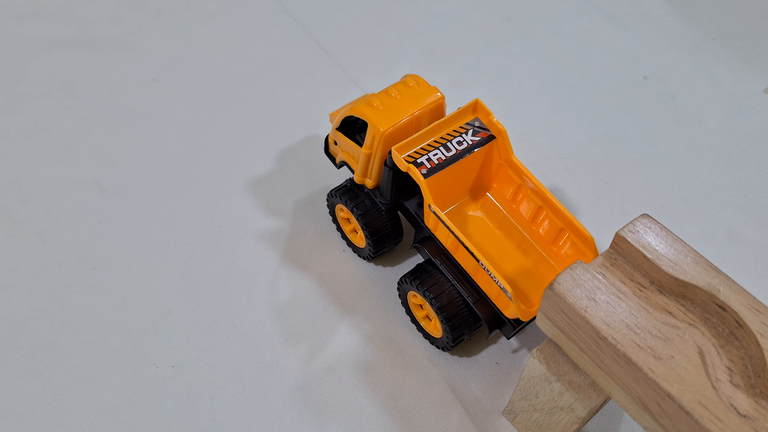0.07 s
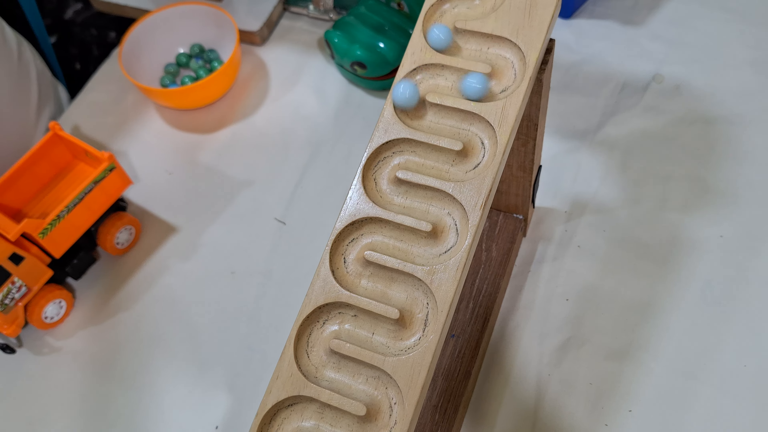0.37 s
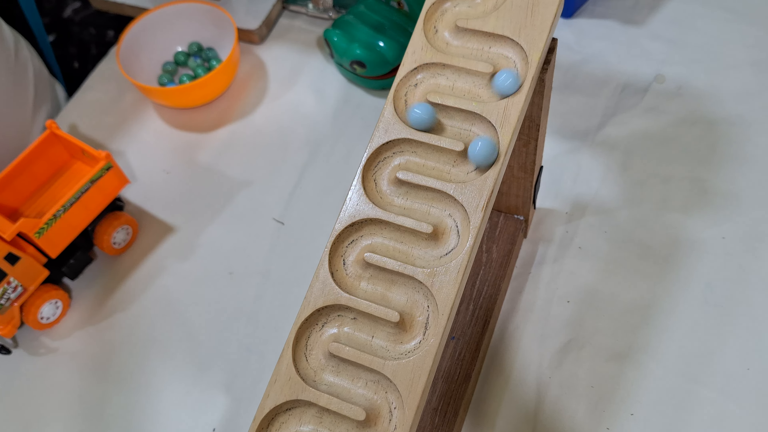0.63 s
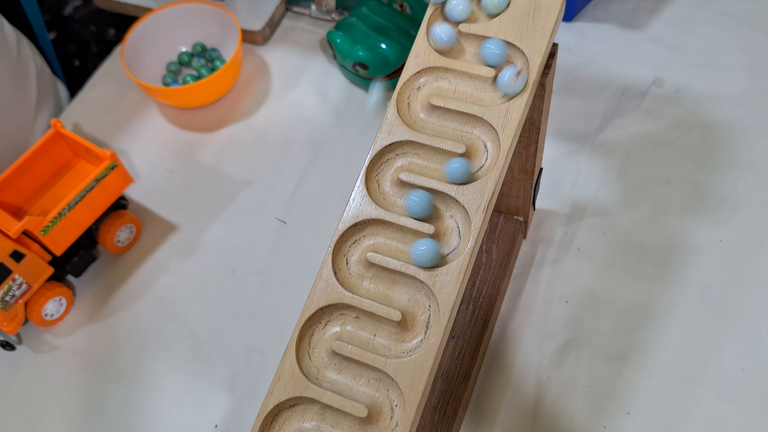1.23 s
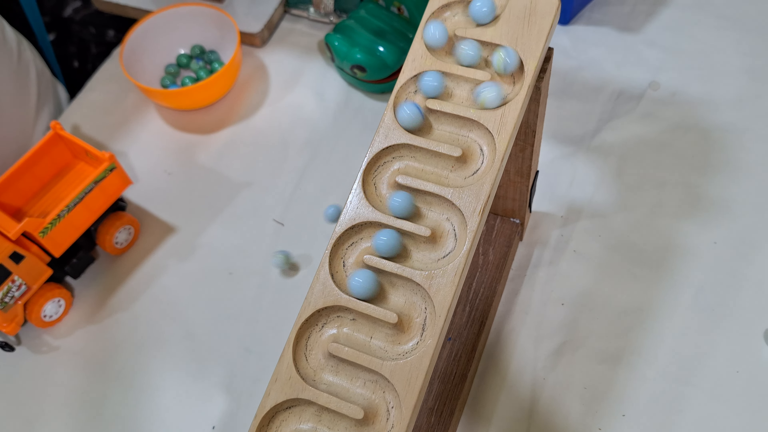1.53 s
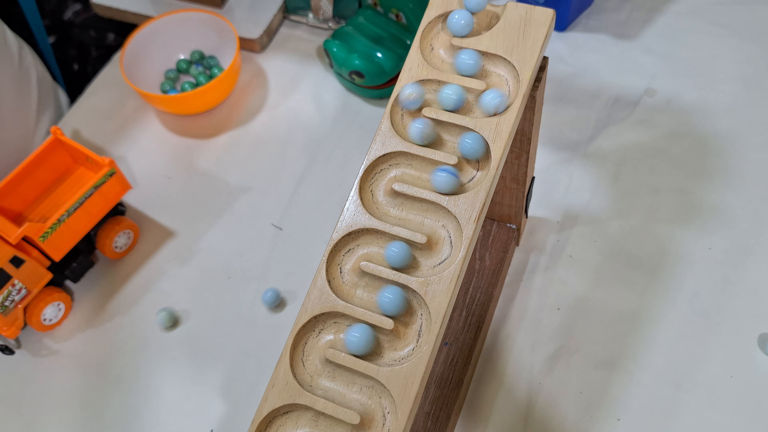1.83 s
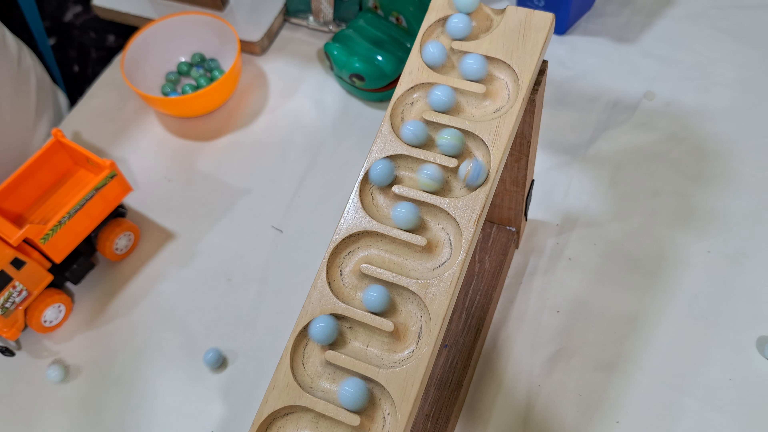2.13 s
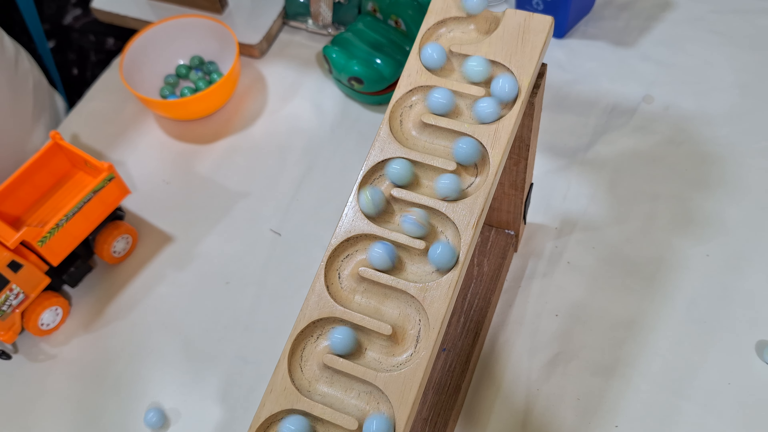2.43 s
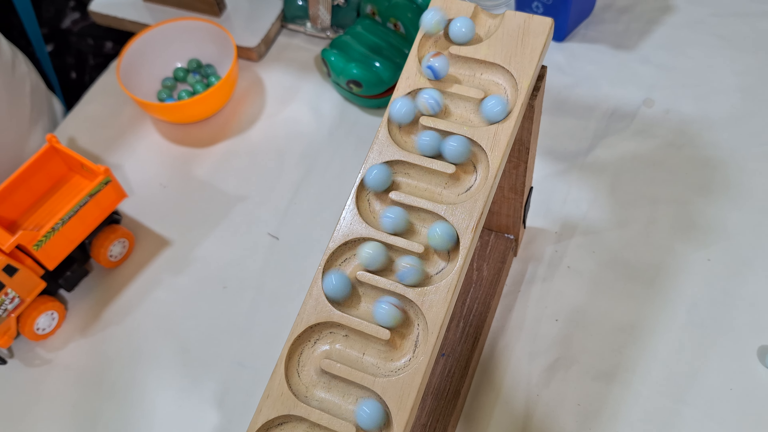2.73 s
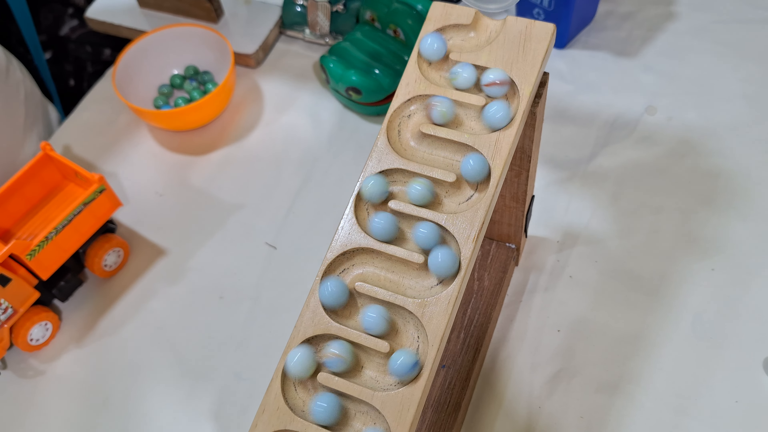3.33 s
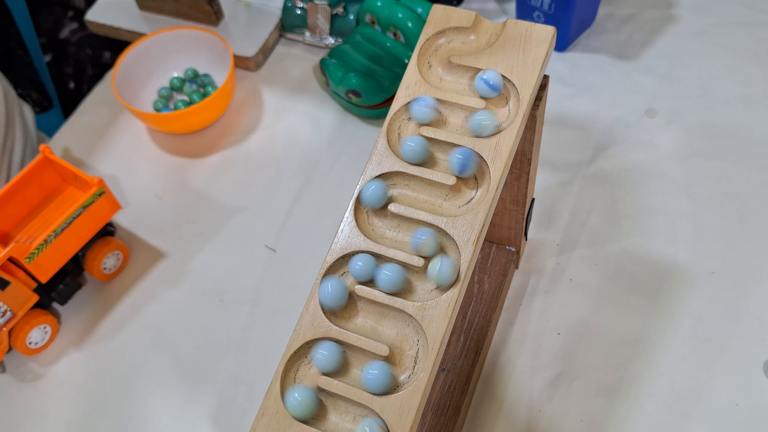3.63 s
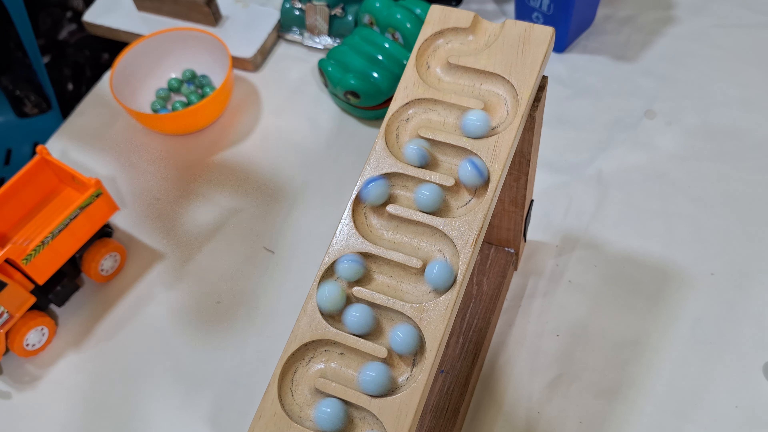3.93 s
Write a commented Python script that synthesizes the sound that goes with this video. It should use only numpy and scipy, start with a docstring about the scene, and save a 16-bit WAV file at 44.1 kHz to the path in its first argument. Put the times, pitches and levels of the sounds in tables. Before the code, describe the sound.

Glass marbles run down a winding wooden groove, heard close in a small room. After faint room tone, the first knocks against a bend at about 0.4 seconds, ringing the wood. More join, rolling and, from 0.8 seconds, clicking against each other. Two strays thud onto the table around 1.4 and 1.5 seconds. Rolling and irregular clacking continue over a low rumble until 4 seconds, the knocks softening after 3.2.

```python
"""Glass marbles run down a winding groove in a wooden slope, close up in a small room.
Out of quiet room tone, the first marble knocks against a bend at 0.36 s and the wood rings.
More and more join in, rumbling along the grain and, from 0.8 s, clicking against each other.
Around 1.4 s two strays drop on the table with a thud.
The rest keep rolling and knocking to the end, over a deep rumble from the table."""
import sys
import numpy as np
from scipy import signal
from scipy.fft import rfft, irfft
from scipy.io import wavfile

SR = 44100
rng = np.random.default_rng(int(sys.argv[2]) if len(sys.argv) > 2 else 0)


def wav_record(signal):
    """Record a signal, one row per channel, as 16-bit PCM in the file named by sys.argv[1]."""
    frames = np.transpose(np.atleast_2d(signal))
    bounded = np.clip(frames, -1, 1)
    # unit amplitude maps onto the largest positive 16-bit level
    quanta = np.round(bounded * 32767).astype(np.int16)
    wavfile.write(sys.argv[1], SR, quanta)


N = 176400
T = np.arange(N) / SR
AGE = T[:SR // 2]  # seconds since an impact

# Hits on the groove wall. Each row: start in seconds, level in dB, hardness in dB (higher is
# brighter), extra ring of the slope in dB.
KNOCKS = [(0.3645, -27, -28, 13), (0.41, -24.5, -45, -4), (0.5182, -11.5, -16.5, -16),
          (0.5431, -17.5, -27, 8), (0.612, -22.5, -47, -2), (0.725, -22.5, -20, -5),
          (0.8066, -6.5, -17, -2.5), (0.8623, -21, -33, -4), (0.8747, -11, -17, -15),
          (0.8909, -12, -25, -1), (0.898, -9.5, -16, -3), (0.944, -14, -15, 0), (0.9745, -2, -15.5, 0.5),
          (1.1336, -3.5, -18.5, -6), (1.187, -8, 1.5, -9), (1.1896, -5.5, -24, -2), (1.322, -10.5, -18, 6),
          (1.386, -15, -19, 1), (1.4381, -14.5, -23, 1.5), (1.464, -11, -18, 1), (1.543, -2, -20, -15),
          (1.715, -14, -27, -17), (1.736, -18.5, -27, 10), (1.8008, -4, -3.5, -1.5), (1.8148, -13, -4, 2),
          (1.9232, -6, -18, -7), (1.9477, -15.5, -21, -3), (1.9974, -12.5, -32, -12), (2.0576, -6, -23, -3),
          (2.145, -13, -18, -13), (2.2679, -8.5, -14, -8), (2.3012, -6.5, -17, -6.5),
          (2.3489, -8.5, -18.5, -3), (2.4157, -16, -21, 3), (2.5014, -16, -28, -16), (2.523, -13, -10, -14),
          (2.5256, -1.5, -13.5, -6.5), (2.6087, -2.5, -19.5, -2), (2.6573, -8.5, -21, -18),
          (2.6696, -4, -13, -1), (2.6727, -14, -2, 5), (2.7586, -15, -27, -12), (2.833, -18, -29, 4),
          (2.8469, -11, -15.5, 6), (2.8855, -3, -20.5, -5), (2.9204, -7.5, -22.5, 0),
          (2.9262, -12, -23, -11), (2.9901, -5.5, -19.5, -6), (3.0287, -13.5, -36, -2), (3.041, -15, -3, 4),
          (3.0628, -7, -11, -6), (3.1508, -1, -16.5, -4.5), (3.1803, -12.5, -13, -9), (3.2968, -17, -17, 7),
          (3.3211, -21.5, -20, 5), (3.3456, -17.5, -31, -7), (3.4227, -20.5, -31, 3),
          (3.4531, -17.5, -16, 0), (3.557, -18.5, -23, -2), (3.567, -19, -27, -4), (3.6292, -14, -25, 0),
          (3.649, -15, -25, -4), (3.684, -13.5, -26, -6), (3.828, -19, -32, 2), (3.8488, -23.5, -29, 5),
          (3.9596, -20.5, -27, -13), (3.9811, -17, -15.5, 0)]
# The dead "tock" of wood under a blow. Each row: pitch in Hz, level in dB, 60 dB decay in seconds.
CONTACT_MODES = [(1526, -17, 0.03), (1924, -7.5, 0.023), (2187, 0, 0.0088), (2800, -2, 0.004),
                 (4027, -20.5, 0.028), (4705, -19, 0.013), (5510, -22.5, 0.014), (7070, -28.5, 0.012)]
# The longer ring of the slope. Each row: pitch in Hz, level in dB, 60 dB decay in seconds.
SLOPE_MODES = [(1239, -11.5, 0.27), (1435, -10.5, 0.3), (1470, -15.5, 0.12), (1513, -14.5, 0.22),
               (1700, -20, 0.29), (1868, -8, 0.26), (1880, -10, 0.14), (2170, -9.5, 0.22),
               (2218, -10.5, 0.44), (2612, 0.5, 0.19), (2650, 1.5, 0.13), (2880, -17, 0.15),
               (3380, -14.5, 0.26), (4005, -10, 0.12), (3970, -24, 0.092)]
# The tone of a knock's tail. Each row: frequency in Hz, level in dB.
KNOCK_TAIL_EQ = [(100, -36), (300, -17), (550, 0.5), (1000, -10), (1400, -1), (2100, -4.5), (2800, 2.5),
                 (3400, -14.5), (4100, -7), (4600, -18.5), (5700, -25), (6600, -32.5), (16000, -41)]
PUSH_S, CONTACT_DETUNE, TABLE_ECHO_S, NORMAL_HARDNESS_DB = 0.00052, 0.019, 0.0042, -18


def knocks():
    """A marble strikes a bend: woody burst, echo off the table, ringing slope, then the room."""
    out = np.zeros((2, N))
    tail = fade(db=-13, t60=0.025) + fade(db=-24.5, t60=0.47)  # close scatter, then the room
    tail *= 1 - np.exp(-(AGE / TABLE_ECHO_S) ** 2)
    snap = amp(3.5 * np.exp(-(AGE / 0.0018) ** 4))  # the first few cycles stand out
    for start, db, hardness, ring_db in KNOCKS:
        burst = ring(CONTACT_MODES, scatter=0.42, detune=CONTACT_DETUNE) * attack(PUSH_S)
        burst += echo(burst, db=-9.5, delay_s=TABLE_ECHO_S * rng.uniform(0.75, 1.3))
        # the slope's brightest ring depends most on where it is struck
        ring_eq = [(2250, 0.52 * ring_db), (2550, ring_db), (2750, ring_db), (3100, 0.52 * ring_db)]
        slope = colour(ring(SLOPE_MODES, scatter=0.77), ring_eq)
        blow = amp(10) * unit_energy(snap * burst) + amp(-19.5) * slope + tail * noise(KNOCK_TAIL_EQ)
        tilt = 0.87 * (hardness - NORMAL_HARDNESS_DB)  # harder blows are brighter
        hardness_eq = [(2000, -0.25 * tilt), (4000, 0.55 * tilt),
                       (5700, 1.12 * tilt), (12000, 0.5 * tilt)]
        add(out, start, amp(db + 1.5) * colour(blow, hardness_eq))
    return out


# Marble-on-marble hits. Each row: start in seconds, level in dB.
CLICKS = [(0.774, -21.5), (0.883, -21.5), (0.9134, -24), (0.937, -25), (0.9937, -23), (1.007, -19),
          (1.0157, -25), (1.0314, -18.5), (1.0894, -24.5), (1.0918, -18), (1.19, -14), (1.257, -19),
          (1.261, -25), (1.4624, -19.5), (1.6475, -26.5), (1.8166, -23.5), (1.842, -24), (1.956, -21.5),
          (1.9776, -21.5), (1.9843, -20), (2.02, -26.5), (2.076, -19.5), (2.111, -25), (2.257, -21),
          (2.321, -14), (2.354, -18.5), (2.548, -20), (2.682, -17.5), (2.7342, -28), (2.756, -22.5),
          (2.8826, -32), (2.899, -14), (2.907, -15), (2.9949, -17.5), (3.0636, -10.5), (3.1393, -21),
          (3.1797, -22.5), (3.246, -24), (3.265, -20), (3.287, -24), (3.509, -15), (3.6148, -21.5),
          (3.683, -20)]
# The tiny ping of glass. Each row: pitch in Hz, level in dB, 60 dB decay in seconds.
GLASS_MODES = [(5540, -33, .005), (7590, -13.5, 0.0027), (10000, -30.5, .004)]
# The bright tone of a click and its tail. Each row: frequency in Hz, level in dB.
GLASS_EQ = [(1000, -41), (4000, -2.5), (5500, 2), (6500, -1), (7500, 3.5), (8700, -2), (12000, -3),
            (16000, -14.5)]
GROOVE_ECHO_S, MAX_MIC_LAG_S, REBOUND_CHANCE, REBOUND_GAP_S = 0.0008, 0.00014, 0.25, 0.0059


def clicks():
    """Glass meets glass: a sharp ping mirrored by the groove, at times a rebound, then the room."""
    out = np.zeros((2, N))
    tail = (fade(db=-15, t60=0.016) + fade(db=-25, t60=0.42)) * attack(0.00046)
    push = pulse(GLASS_EQ)
    for start, db in CLICKS:
        path, side, gap, odds = rng.random(4)
        click = push + ring(GLASS_MODES, scatter=0.47)
        click += echo(click, db=-5.5, delay_s=GROOVE_ECHO_S * (0.5 + path))
        click[0] = np.roll(click[0], int(side * MAX_MIC_LAG_S * SR))  # reaches the left mic later
        click = unit_energy(click)
        if odds < REBOUND_CHANCE:
            click += echo(click, db=-7, delay_s=REBOUND_GAP_S * (0.5 + gap))
        room = tail * chatter() * noise(GLASS_EQ)
        add(out, start, amp(db + 0.5) * (amp(11.5) * click + room))
    return out


def chatter(depth_db=2.5, steps_per_s=380):
    """Many tiny contacts and reflections roughen a click's tail: a ragged envelope of rms 1."""
    steps = np.clip(rng.standard_normal(len(AGE)), -2, 2)
    return unit(amp(depth_db * np.interp(AGE * steps_per_s, np.arange(len(steps)), steps)))


# Drops on the table, two heavy and two faint. Each row: start in seconds, level in dB.
THUDS = [(1.3607, -2.5), (1.49, -2), (1.558, -25), (1.668, -19.5)]
# The boom of the table top. Each row: pitch in Hz, level in dB, 60 dB decay in seconds.
TABLE_MODES = [(74.3, -18.5, 0.75), (107.4, -19, 0.52), (127, -9, 0.1), (214, -13, 0.26),
               (257, -16.5, 0.21), (500, -11, 0.05), (700, -8.5, 0.05), (771, -11.5, 0.069),
               (890, -8, 0.041), (1040, -15, 0.067), (1240, -3, 0.019)]
# The dark tone of a thud's tail. Each row: frequency in Hz, level in dB.
THUD_TAIL_EQ = [(40, -30), (70, 1), (115, 5), (220, 4.5), (320, -7), (500, -5), (900, -10), (1300, -14),
                (1900, -17), (4000, -33), (16000, -70)]


def thuds():
    """A stray marble lands on the table: a blunt push, then the top booms and dies away."""
    out = np.zeros((2, N))
    tail = (fade(db=-6.5, t60=0.044) + fade(db=-17, t60=0.73)) * attack(0.0018)
    push = amp(-6.5) * pulse([(300, -2), (1200, -10), (2200, -34), (8000, -65)])
    dull_eq = [(40, -23), (70, -3), (1400, 1.5), (2500, -3), (8000, -52)]
    for start, db in THUDS:
        boom = (ring(TABLE_MODES, scatter=0.4) + tail * noise(THUD_TAIL_EQ)) * attack(0.00032)
        add(out, start, amp(db - 2.5) * colour(push + boom, dull_eq))
    return out


# The fader ride for the rolling and its hops. Each row: time in seconds, level in dB.
ROLL_RIDE = [(0.3, -10.5), (0.43, -54), (0.55, -41.5), (0.72, -41), (0.82, -39), (1.02, -31), (1.23, -36),
             (1.34, -34), (1.8, -33.5), (1.93, -31.5), (2.65, -32), (2.83, -29.5), (3.05, -31), (3.29, -30),
             (3.69, -32.5), (4.0, -29.5)]
# The body of glass rolling on wood. Each row: frequency in Hz, level in dB.
ROLL_EQ = [(88, -44), (150, -16), (165, -3.5), (209, -9), (303, -11.5), (566, -0.5), (774, 0), (1040, -6.5),
           (1900, -1.5), (2400, -12.5), (2700, -1.5), (2870, -18), (4080, -19.5), (4410, -24), (5570, -26),
           (11300, -42.5), (16000, -59)]
ROLL_START_S = KNOCKS[0][0]


def rolling(surge_db=1.33, steps_per_s=18):
    """Bumps drive the slope and its modes, surging as the marbles swing round the bends."""
    steps = rng.standard_normal(N // 100)
    surge = amp(surge_db * np.interp(T * steps_per_s, np.arange(len(steps)), steps))
    body = spread(np.array([bumps(), bumps()]), ROLL_EQ)
    ringing = np.zeros((2, N))
    for _ in range(2):
        ringing += signal.fftconvolve(bumps()[None], ring(SLOPE_MODES, scatter=0.99), axes=1)[:, :N]
    ringing = unit(colour(ringing, [(1500, 2), (2600, -11), (4000, -13.5)]))
    fade_in = np.clip((T - ROLL_START_S) / 0.0085, 0, 1)
    return (body + amp(-6) * ringing) * surge * ride(ROLL_RIDE) * fade_in


def bumps(per_s=1400, spread_db=3):
    """Tiny irregular impacts of glass on the grain of the wood."""
    direction, strength = rng.standard_normal((2, N))
    hits = rng.random(N) < per_s / SR
    return hits * np.sign(direction) * amp(spread_db * np.clip(strength, -2, 2))


# The noisy edge of a hop's landing. Each row: frequency in Hz, level in dB.
HOP_EQ = [(400, -9), (800, -7), (2000, 2.5), (3000, -4), (4100, -15), (5600, -17), (7500, -8), (12000, -16),
          (16000, -35)]


def hops(per_s=36, size=2048):
    """Marbles hop over flaws in the groove and land with small woody taps, no two alike."""
    out = np.zeros((2, N))
    level = ride(ROLL_RIDE)
    push, decay = attack(PUSH_S)[:size], fade(db=0, t60=0.019)[:size]
    for slot in np.arange(ROLL_START_S, N / SR - 1 / per_s, 1 / per_s):
        start = slot + rng.random() / per_s
        gain = amp(22 + 3.5 * rng.uniform(-1.9, 1)) * level[int(start * SR)]
        wood = unit_energy(push * ring(CONTACT_MODES, scatter=1.0, detune=CONTACT_DETUNE, size=size))
        edge = amp(-2) * unit_energy(decay * noise(HOP_EQ, size=size))
        add(out, start, gain * colour(wood + edge, [(4100, -0.5), (4700, -12)]))
    return out


# The low end under the rolling. Each row: frequency in Hz, level in dB.
RUMBLE_EQ = [(25, -35), (40, -9), (55, 5.5), (72, 4.5), (100, -16), (150, -11.5), (250, -17), (600, -60)]
# The fader ride for that low end. Each row: time in seconds, level in dB.
RUMBLE_RIDE = [(0, -48), (.5, -43), (1, -45), (1.7, -46.5), (2.1, -40), (2.5, -44), (2.8, -35),
               (3.1, -44.5), (3.6, -36.5), (4, -37.5)]


def table_rumble():
    """The table rumbles below the slope in slow swells."""
    return ride(RUMBLE_RIDE) * noise(RUMBLE_EQ, size=N)


# The bed of the quiet room. Each row: frequency in Hz, level in dB.
ROOM_TONE_EQ = [(25, -32), (40, -20), (66, -15), (102, 2.5), (150, -11.5), (190, -19), (280, -19.5),
                (460, -20), (900, -31), (1150, -25.5), (1800, -37.5), (2800, -32), (4200, -42),
                (10000, -49), (16000, -54)]


def room_tone():
    """Faint steady noise, strongest near 100 Hz."""
    return amp(-43) * noise(ROOM_TONE_EQ, size=N)


# The stereo width of the noise layers. Each row: frequency in Hz, side against mid in dB.
WIDTH = [(60, -15.5), (250, -12.5), (600, -15), (1400, 0), (2500, -0.5), (8000, 0.5)]


def spread(pair, eq):
    """Turn two unrelated signals into a coloured stereo sound of rms 1, wider in the treble."""
    size = pair.shape[1]
    mid, side = rfft(pair) * gains(eq, size)
    side = side * gains(WIDTH, size)
    return unit(irfft(np.array([mid + side, mid - side]), size))


def noise(eq, size=len(AGE)):
    """Coloured stereo noise."""
    return spread(rng.standard_normal((2, size)), eq)


def ring(modes, scatter, detune=0.0054, size=len(AGE)):
    """Decaying modes; their strengths vary with where the blow lands and the side they are heard from."""
    hz, db, t60 = np.array(modes).T[:, :, None]
    hz = hz * (1 + detune * rng.standard_normal(hz.shape))
    waves = amp(db - 60 * AGE[:size] / t60) * np.sin(2 * np.pi * hz * AGE[:size])
    by_spot = rng.standard_normal(len(modes))
    by_side = rng.standard_normal((2, len(modes)))
    return (1 + scatter * (by_spot + by_side) / np.sqrt(2)) @ waves


def pulse(eq):
    """One sharp push with the given (Hz, dB) spectrum, peak 1."""
    push = colour(np.array([AGE == 0, AGE == 0], float), eq)
    return push / np.abs(push).max()


def colour(x, eq):
    """Causal filter with the given (Hz, dB) response."""
    cepstrum = irfft(np.log(gains(eq, size=2048)))
    half = len(cepstrum) // 2
    folded = np.r_[cepstrum[0], 2 * cepstrum[1:half], np.zeros(half)]
    response = irfft(np.exp(rfft(folded)))
    return signal.fftconvolve(x, response[None], axes=1)[:, :x.shape[1]]


def gains(eq, size):
    """A (Hz, dB) table as gains on the frequency bins of a signal."""
    hz, db = np.array(eq, float).T
    return amp(np.interp(np.log(np.fft.rfftfreq(size, 1 / SR) + 1), np.log(hz), db))


def ride(points):
    """A (s, dB) table as a gain over time."""
    return amp(np.interp(T, *np.array(points).T))


def attack(seconds):
    """Exponential rise from 0 to 1."""
    return 1 - np.exp(-AGE / seconds)


def fade(db, t60):
    """Decay from a level, losing 60 dB every t60 seconds."""
    return amp(db) * amp(-60 * AGE / t60)


def echo(x, db, delay_s):
    """A later, quieter copy of a short sound."""
    return amp(db) * np.roll(x, int(delay_s * SR), axis=1)


def amp(db):
    """Decibels to gain."""
    return 10 ** (np.maximum(db, -200) / 20)


def unit(x):
    """Scale to rms 1."""
    return x / np.sqrt(np.mean(x ** 2))


def unit_energy(x):
    """Scale a short sound to an average energy of 1 per channel."""
    return unit(x) / np.sqrt(x.shape[1])


def add(out, start, sound):
    """Mix a sound in at a time in seconds."""
    i = int(start * SR)
    out[:, i:i + sound.shape[1]] += sound[:, :N - i]


def scene():
    """All the marbles over the quiet room."""
    return knocks() + clicks() + hops() + thuds() + rolling() + table_rumble() + room_tone()


# How the stereo image leans. Each row: frequency in Hz, left minus right in dB.
BALANCE = [(60, 2), (500, 2), (900, -0.5), (1450, 6.5), (2200, 0.5), (2650, -.5), (3600, 1.5), (5000, -2),
           (8000, -5.5), (15000, -7)]
LOW_CUT_HZ, HIGH_CUT_HZ = 45, 15900


def record(dry):
    """Two microphones differ in colour and lose the deepest bass; peaks clip and the top is cut."""
    dry = signal.sosfilt(signal.butter(2, LOW_CUT_HZ, "high", fs=SR, output="sos"), dry)
    left = colour(dry[:1], [(hz, db / 2) for hz, db in BALANCE])
    right = colour(dry[1:], [(hz, -db / 2) for hz, db in BALANCE])
    low_pass = signal.ellip(8, 0.2, 70, HIGH_CUT_HZ, fs=SR, output="sos")
    return signal.sosfilt(low_pass, np.clip(np.vstack([left, right]), -1, 1))


dry = scene()
out = record(dry)
wav_record(out)
```